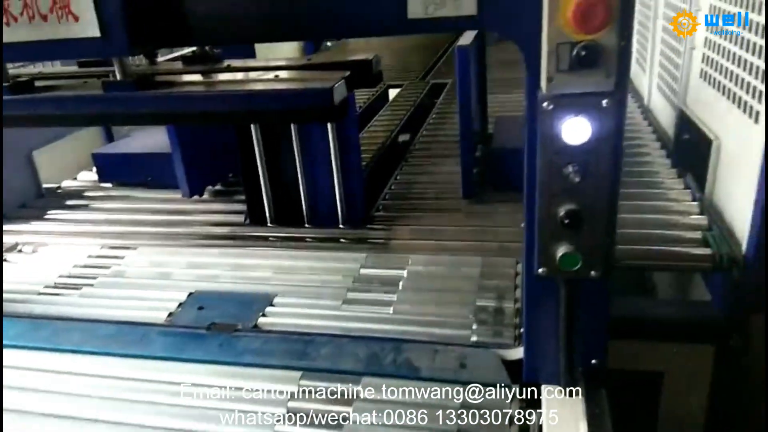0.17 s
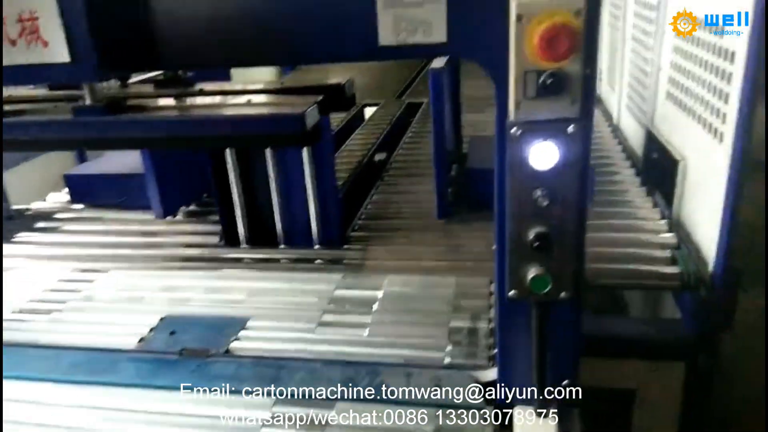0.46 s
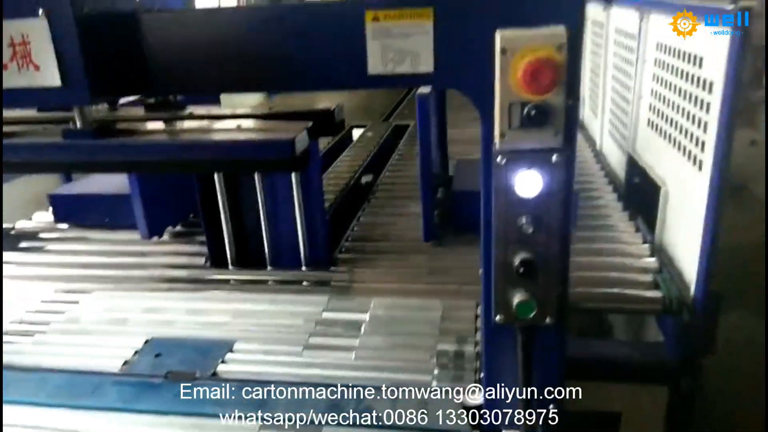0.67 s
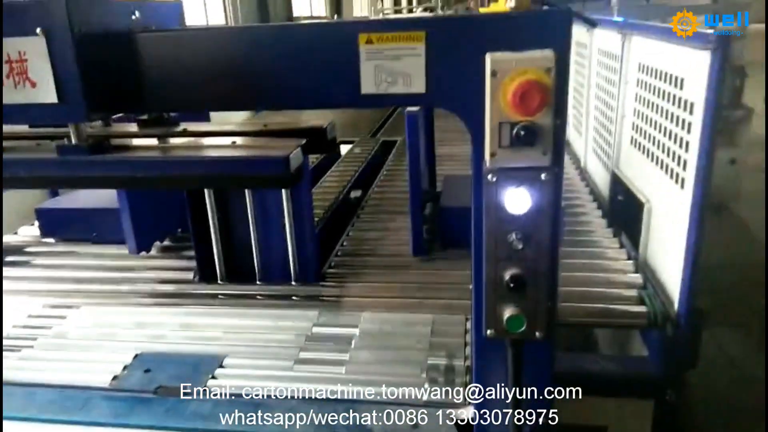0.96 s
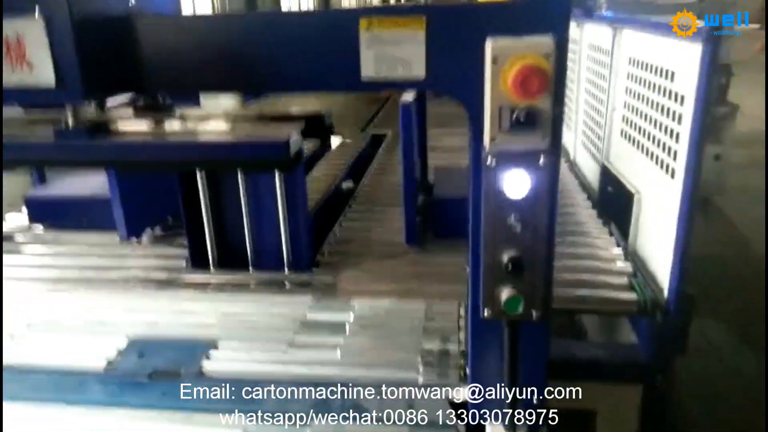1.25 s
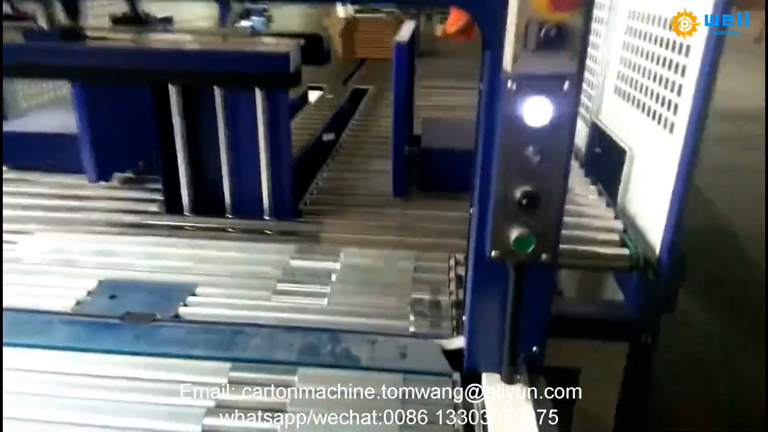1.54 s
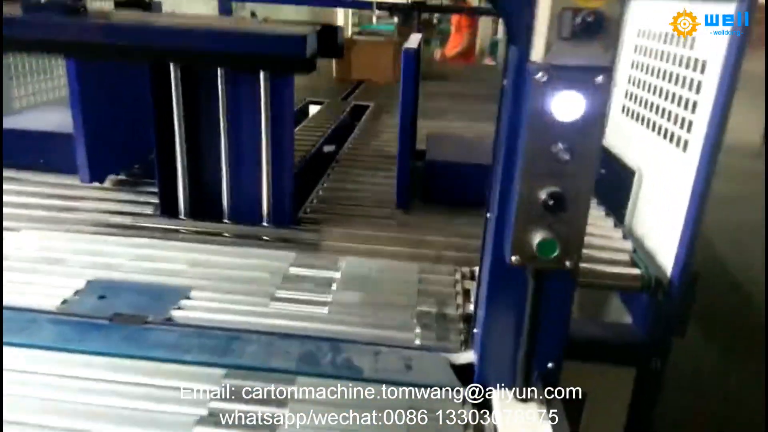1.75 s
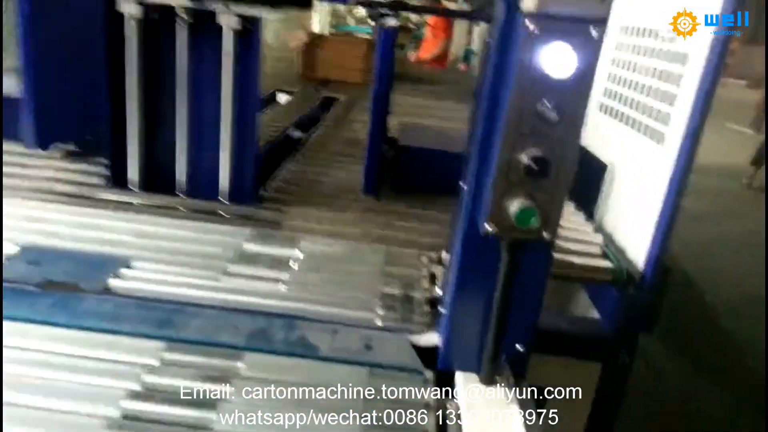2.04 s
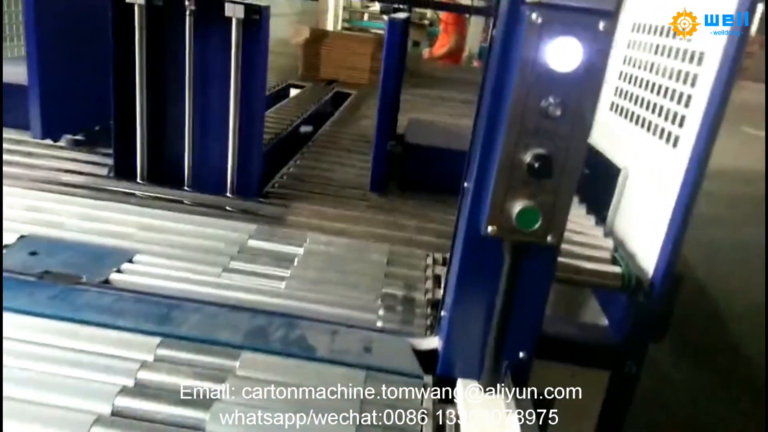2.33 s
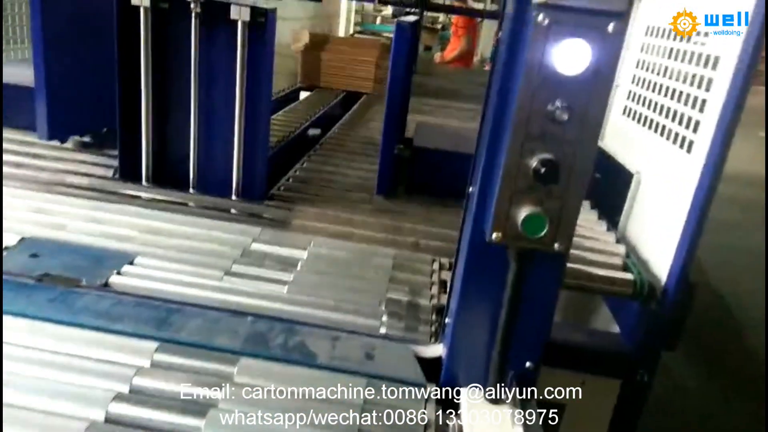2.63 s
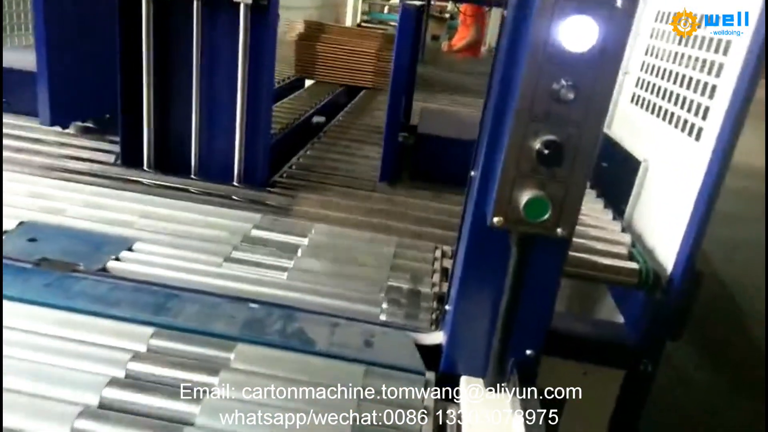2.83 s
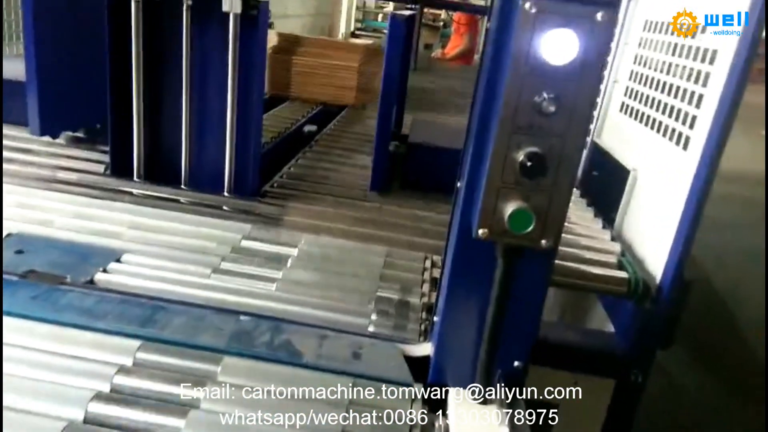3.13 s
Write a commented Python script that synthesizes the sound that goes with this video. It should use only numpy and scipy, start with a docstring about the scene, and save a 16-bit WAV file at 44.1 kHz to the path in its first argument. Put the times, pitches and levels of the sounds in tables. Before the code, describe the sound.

Close to a carton machine in a factory hall, a steel carriage slides and squeals with an air puff, slams twice within the first second, then rollers rumble and knock until cardboard scuffs past.

```python
"""In a factory hall, close to a carton machine: a steel carriage slides, rattles and squeals, then slams twice
against its stops; valves let out puffs of air and cardboard scuffs past, all as shaped noise and ringing modes.
Rollers knock in the frame as dying tones, over a rumble of noise and shaken modes. Farther off the hall hisses
and whines; its reflections follow the slams, gusts, scuffs and a far carriage."""
import sys
import numpy as np
from scipy import signal
from scipy.fft import rfft, irfft
from scipy.io import wavfile

SR = 44100
rng = np.random.default_rng(int(sys.argv[2]) if len(sys.argv) > 2 else 0)


def digitize_waveform(pressure):
    """Quantize a signal to 16-bit integers and store it at the path in sys.argv[1].

    Rows of a 2-D input are taken as channels; values are limited to [-1, 1].
    """
    field = np.atleast_2d(pressure).T
    bounded = np.clip(field, -1, 1)
    quanta = np.round(bounded * 32767).astype(np.int16)
    wavfile.write(sys.argv[1], SR, quanta)


def boost(x):
    """Linear amplitude factor 10**(x/20) for a level x in decibels (scalar or array-like)."""
    u = np.asarray(x, float) / 20
    return 10 ** u


N = 145089

# modes of the steel parts: (pitch [Hz], level [dB], t60 before the cap below [s])
STEEL = [(1427, 1.5, .04), (1690, 0, 0.043), (2460, -1, 0.036), (3505, 1.5, 0.033), (3756, 1, .04),
         (4210, 3, 0.022), (4610, -2.5, 0.036), (4810, -4, 0.023), (4925, -8, 0.026), (5165, 0.5, 0.027),
         (5320, -0.5, 0.031), (5800, -4, 0.013), (6430, -0.5, 0.019), (7150, -5, 0.016)]
STEEL_MAX_T60_S = 0.035
# spectrum of steel sliding on steel: (frequency [Hz], density [dB per Hz])
SLIDE_SPECTRUM = [(530, 2), (900, -4), (1050, -1), (2020, -4.5), (2790, -1), (3140, -4.5), (3670, 0),
                  (5310, 0), (7500, -14.5), (13800, -25), (15500, -28)]
CLICK_SPREAD_DB = 2.6  # mean excess of the random clicks behind rattle and ticks
KNOCK_RISE_S = 0.0028  # soft start of the roller knocks


def rms_one(x):
    """Scale to rms 1."""
    return x / np.sqrt(np.mean(x ** 2) + 1e-20)


def in_time(rows):
    """Gain from (time [s], level [dB]) rows, silent after the last."""
    s, db = np.transpose(rows)
    return boost(np.interp(np.arange(N) / SR, s, db, right=-120))


def drift(rate_hz):
    """Slow random wander of rms about 1: noise through two equal low-pass poles, computed at SR / 40."""
    pole = np.exp(-80 * np.pi * rate_hz / SR)
    slow = signal.lfilter([1], [1, -2 * pole, pole ** 2], rng.standard_normal(N // 40 + 2002))
    slow = rms_one(slow[2000:])  # the filter has settled
    return np.interp(np.arange(N) / 40, np.arange(len(slow)), slow)


def ring(clicks, hz, t60):
    """A damped resonance: a unit click sets a sine of starting height 1 ringing."""
    radius = boost(-60 / (max(t60, 0.003) * SR))
    angle = 2 * np.pi * hz / SR
    feedback = [1, -2 * radius * np.cos(angle), radius ** 2]
    return signal.lfilter([0, np.sin(angle)], feedback, clicks + 1e-18)


def colour(x, spectrum, tilt_db=0):
    """Shape by a spectrum over log frequency and a tilt in dB per octave; rms 1."""
    octave = np.log2(np.arange(N // 2 + 1) * SR / N + 1)
    hz, db = np.transpose(spectrum)
    gain_db = np.interp(octave, np.log2(hz), db, left=-90, right=-90) + tilt_db * octave
    return rms_one(irfft(rfft(x) * boost(gain_db), N))


def noise(spectrum, tilt_db=0):
    """Coloured noise whose level flickers by 0.6 dB."""
    return colour(rng.standard_normal(N), spectrum, tilt_db) * boost(0.6 * drift(22))


def grains(per_s, spread_db):
    """Random clicks of uneven size and either sign."""
    present = rng.random(N) < per_s / SR
    size = boost(spread_db * np.minimum(rng.exponential(1, N), 4))
    return present * size * rng.choice([-1, 1], N)


def whistle(hz, width_hz):
    """Noise passed twice through a narrow resonance; rms 1."""
    t60 = np.log(1000) / (np.pi * width_hz)
    once = ring(rng.standard_normal(N), hz, t60)
    return rms_one(ring(once, hz, t60))


def struck(rows, t60, rise_s):
    """Each (time [s], level [dB], pitch [Hz]) row rings one dying sine with a soft start."""
    out, t = np.zeros(N + SR), np.arange(SR // 2) / SR
    for s, db, hz in rows:
        i = int(s * SR)
        soft_start = (1 - np.exp(-t / rise_s)) ** 2
        out[i:i + len(t)] += boost(db - 60 * t / t60(hz)) * soft_start * np.sin(2 * np.pi * hz * t)
    return out[:N]


def gusts(rows, spectrum):
    """Noise bursts that rise linearly, hold and die exponentially, each with its own tilt."""
    out, t = 0, np.arange(N) / SR
    for s, db, attack, hold, t60, tilt_db in rows:
        rise = np.clip((t - s) / attack, 0, 1)
        fall = boost(db - 60 * np.maximum(t - s - attack - hold, 0) / t60)
        out = out + rise * fall * noise(spectrum, tilt_db)
    return out


def far_hall():
    """The far hall: steady noise as hiss, and a narrow band of noise as a wavering whine."""
    # hiss: (frequency [Hz], density [dB per Hz])
    hiss_spectrum = [(530, 8), (900, -9.5), (990, -8), (1350, -10), (2200, -11), (2890, -9), (4660, -12),
                     (5840, -10.5), (6350, -15), (8750, -18), (15500, -37.5)]
    hiss_db, whine_db, whine_hz, whine_width_hz = -47.5, -61, 6003, 75
    hiss = boost(hiss_db) * noise(hiss_spectrum)
    whine = boost(whine_db + 2 * drift(10)) * whistle(whine_hz, whine_width_hz)
    return hiss + whine


def hall_reflections(x):
    """Dense reflections: decaying noise above 300 Hz that begins 8 ms after the direct sound."""
    t60_s, wet_db = 0.39, -11
    t = np.arange(SR) / SR
    tail = rng.standard_normal(SR) * boost(-60 * t / t60_s) * (t > 0.008)
    tail = signal.sosfilt(signal.butter(2, [300, 22000], "band", fs=SR, output="sos"), tail)
    tail = tail / np.sqrt(np.sum(tail ** 2))
    return boost(wet_db) * signal.fftconvolve(x, tail)[:N]


def far_slide():
    """A farther carriage slides briefly: one burst of sliding noise."""
    # (time [s], level [dB], attack [s], hold [s], t60 [s], tilt [dB per octave])
    far_slides = [(2.612, -43.5, 0.0066, 0.036, 0.73, -2.5)]
    return gusts(far_slides, SLIDE_SPECTRUM)


def rollers():
    """Rumble, frame modes shaken by random bumps, deep bass, and knocks as dying tones."""
    # vigour of the rollers, driving rumble and frame: (time [s], level [dB])
    roll_level = [(0.0, -33.5), (0.06, -34.5), (0.19, -35), (0.93, -31.5), (0.96, -31), (1.03, -34.5),
                  (1.61, -36.5), (1.69, -33.5), (2.17, -34), (2.57, -32), (2.65, -33), (2.72, -29.5),
                  (2.93, -32), (3.1, -30.5), (3.29, -33)]
    # rumble: (frequency [Hz], density [dB per Hz])
    rumble_spectrum = [(15, -39), (25, -65), (59, -11.5), (92, -4.5), (261, -0.5), (300, -6), (338, -5),
                       (468, -11), (575, -8), (659, -11.5), (756, -10), (1120, -25), (1500, -30),
                       (1950, -37), (3300, -120)]
    # deep bass: (time [s], level [dB])
    bass_level = [(0, -69), (.7, -51), (1.0, -47), (1.5, -52.5), (1.8, -46), (2.2, -46.5), (2.6, -42.5),
                  (3.0, -43), (3.29, -33)]
    # modes of the frame: (pitch [Hz], level [dB], t60 [s])
    frame_modes = [(64.8, 6, 0.091), (178, -5, 0.065), (276, 4, 0.17), (335.6, 0, 0.13), (580, -2, 0.14),
                   (661.2, -1, 0.22)]
    # roller knocks: (time [s], level before the soft start [dB], pitch [Hz])
    knock_rows = [(0.061, -18.5, 339), (0.676, -25, 168), (0.713, -19, 250), (0.737, -21.5, 231),
                  (0.755, -19, 347), (0.77, -22, 227), (0.857, -18.5, 252), (0.89, -22, 268),
                  (0.94, -18, 260), (0.953, -7.5, 250), (1.351, -22.5, 248), (1.685, -21, 190),
                  (1.734, -19, 267), (1.77, -19.5, 277), (1.823, -18, 243.4), (1.858, -21, 263),
                  (1.989, -26.5, 150), (2.126, -24.5, 260), (2.254, -17.5, 260), (2.305, -22, 250),
                  (2.341, -22, 268), (2.402, -23.5, 184), (2.458, -24, 187), (2.486, -19.5, 307),
                  (2.523, -16, 261), (2.555, -21, 182), (2.599, -19.5, 365), (2.718, -20, 239),
                  (2.809, -21.5, 247), (3.043, -22, 242), (3.101, -13.5, 259), (3.243, -24.5, 287)]
    # lighter, higher knocks: (time [s], level before the soft start [dB], pitch [Hz])
    tap_rows = [(0.04, -28, 515), (0.321, -23, 730), (0.519, -16.5, 720), (0.556, -23.5, 600),
                (0.59, -23.5, 535), (0.813, -28, 490), (1.914, -25.5, 604), (2.029, -24, 670),
                (2.107, -27.5, 700), (2.539, -33, 654), (2.675, -20.5, 675), (2.703, -24, 573),
                (2.787, -27, 554), (2.961, -26, 595), (3.008, -18, 564), (3.113, -20, 688),
                (3.233, -21, 562)]
    bumps_per_s, frame_db = 60.0, -8  # the bumps are drawn anew at this rate for each mode
    knock_cycles, tap_cycles = 25.8, 48.5  # cycles until 60 dB down

    shaken = sum(boost(db) * ring(grains(bumps_per_s, 5.2), hz, t60) for hz, db, t60 in frame_modes)
    rumble = boost(-3) * noise(rumble_spectrum) + boost(frame_db) * rms_one(shaken)
    bass = in_time(bass_level) * whistle(68, 46)
    knocks = struck(knock_rows, lambda hz: knock_cycles / hz, KNOCK_RISE_S)
    taps = struck(tap_rows, lambda hz: tap_cycles / hz, KNOCK_RISE_S)
    return in_time(roll_level) * rumble + bass + knocks + taps


def ticks():
    """Small roller ticks: random brief pings at 24 scattered pitches, their level wavering."""
    # (time [s], level [dB])
    tick_level = [(0, -57), (1.9, -57), (2.05, -54), (2.3, -56.5), (2.5, -52), (3.29, -52.5)]
    ticks_per_s, low_hz, high_hz, cycles = 600.0, 2000, 3200, 60.0  # cycles until 60 dB down
    pitches = np.geomspace(low_hz, high_hz, 24)
    rate = ticks_per_s / len(pitches)
    pings = rms_one(sum(ring(grains(rate, CLICK_SPREAD_DB), hz, cycles / hz) for hz in pitches))
    return in_time(tick_level) * boost(2 * drift(8)) * pings


def scuffs():
    """Cardboard scuffs past: bursts of noise in the bands of the card."""
    # (time [s], level [dB], attack [s], hold [s], t60 [s], tilt [dB per octave])
    scuff_rows = [(3.132, -29.5, 0.031, 0.019, 0.29, 4.2), (3.225, -37.5, 0.011, 0.024, 0.55, 5)]
    # cardboard, before the tilt: (frequency [Hz], density [dB per Hz])
    card_spectrum = [(410, -22), (700, 2.5), (920, -21), (1190, 3.5), (1430, -11), (1850, -2),
                     (2300, -14.5), (2570, -5.5), (3150, -25), (4300, -25.5), (6000, -39), (12000, -80)]
    return gusts(scuff_rows, card_spectrum)


def puffs():
    """Valves let out air: turbulent noise that bursts out and dies away."""
    # (time [s], level [dB], attack [s], hold [s], t60 [s], tilt [dB per octave])
    puff_rows = [(.045, -32.5, 0.013, 0.037, 0.7, -1.5), (.572, -42.5, .002, .005, 0.15, 2),
                 (1.485, -42.5, 0.018, 0.045, 1.0, -1.9)]
    # escaping air, before the tilt: (frequency [Hz], density [dB per Hz])
    air_spectrum = [(1880, -10), (3200, -4), (4030, -5), (5530, -1), (8790, -5), (10600, -5.5),
                    (11400, -9.5), (15500, -10.5)]
    return gusts(puff_rows, air_spectrum)


def early_scuff():
    """Cardboard scuffs past early on: a long dying burst of low, broad noise."""
    # (time [s], level [dB], attack [s], hold [s], t60 [s], tilt [dB per octave])
    early_scuff_rows = [(.7, -31.5, 0.0089, 0.023, 1.18, -2)]
    # cardboard of the early scuff, before the tilt: (frequency [Hz], density [dB per Hz])
    early_card_spectrum = [(300, -4), (800, -6.5), (1050, 0), (1900, -5.5), (2300, -13)]
    return gusts(early_scuff_rows, early_card_spectrum)


def glide():
    """Second squeal, rising as the carriage gains speed: a narrow noisy tone on a pitch curve."""
    # (time [s], level [dB], pitch [Hz])
    glide_rows = [(.55, -70, 3550), (.6, -44, 3600), (.66, -42, 3850), (.72, -41, 4150), (.8, -39.5, 4230),
                  (.93, -40.5, 4220), (1.0, -70, 4220)]
    width_hz = 75
    s, db, hz = np.transpose(glide_rows)
    phase = np.cumsum(np.interp(np.arange(N) / SR, s, hz)) * 2 * np.pi / SR
    tone = drift(width_hz) * np.sin(phase) + drift(width_hz) * np.cos(phase)
    return in_time(np.c_[s, db]) * tone * boost(2 * drift(15))


def carriage():
    """Friction noise, loose parts rattling in the steel modes, the squeal and single chinks."""
    # sliding noise and rattle: (time [s], level [dB])
    slide_level = [(0, -28.5), (.05, -25.5), (.12, -26.5), (.2, -33.5), (.3, -34), (.45, -28.5),
                   (.56, -32.5), (.6, -30), (.75, -31), (.93, -31.5), (1.05, -34.5), (1.2, -43.5),
                   (1.4, -64)]
    # squeal of the guide: (time [s], level [dB])
    squeal_level = [(0.0, -47), (0.036, -37), (0.11, -39), (0.202, -52), (0.346, -64), (0.514, -65),
                    (0.762, -35.5), (0.778, -42.5), (0.972, -44), (1.2, -77)]
    # chinks: (time [s], level before the soft start [dB], pitch [Hz])
    chink_rows = [(0.0328, -30, 2790), (0.5726, -24, 3570), (0.6115, -22, 3600), (0.6495, -26.5, 5340),
                  (0.8444, -32, 4200), (1.5075, -38, 7800), (2.4877, -39, 3640), (2.503, -41, 2710),
                  (2.6793, -40, 2630), (2.8933, -40.5, 2170), (3.195, -43, 4170), (3.2585, -37, 2500)]
    rattle_per_s, rattle_db = 430, -13.5
    squeal_hz, squeal_width_hz = 2843, 22
    chink_t60_s, chink_rise_s = 0.063, 0.00049

    rattle = 0
    for hz, db, t60 in STEEL:
        clicks = grains(rattle_per_s / len(STEEL), CLICK_SPREAD_DB)
        rattle = rattle + boost(db) * ring(clicks, hz, min(t60, STEEL_MAX_T60_S))
    friction = boost(-4.5) * noise(SLIDE_SPECTRUM)
    slide = in_time(slide_level) * (friction + boost(rattle_db) * rms_one(rattle))
    squeal = in_time(squeal_level) * whistle(squeal_hz, squeal_width_hz)
    return slide + squeal + struck(chink_rows, lambda hz: chink_t60_s, chink_rise_s)


def slams():
    """Each slam is a dying clatter into the steel modes near its pitch, with a broad crack."""
    # slams and rebounds: (time [s], clatter peak [dB], t60 of the fall [s], strongest pitch [Hz],
    # crack level [dB])
    slam_rows = [(0.3228, -8.5, 0.15, 3800, -14.5), (0.355, -10.5, 0.13, 4930, -21),
                 (0.376, -17.5, 0.28, 3680, -35), (.941, -3, 0.081, 5380, -18), (.946, -8.5, .1, 5200, -34),
                 (0.953, -16.5, 0.12, 4200, -30.5), (0.964, -17, 0.22, 4660, -29)]
    # crack: (frequency [Hz], density [dB per Hz])
    crack_spectrum = [(350, -22), (600, -14.5), (1690, -6.5), (2370, -18.5), (2990, -8), (3240, -9.5),
                      (5220, -4), (7330, -17), (10700, -15.5), (15500, -22)]
    spread_oct, max_off_db, clatter_per_s = 0.33, 12, 4000.0  # modes off the pitch are 6 dB down at the spread
    # the treble of a crack starts stronger and dies sooner
    snap_hz, snap_db, snap_faster, crack_rise_s = 7040, 4, 2.9, 0.0022

    out, t = np.zeros(N), np.arange(N) / SR
    crack = noise(crack_spectrum)
    treble = signal.sosfilt(signal.butter(2, snap_hz, "high", fs=SR, output="sos"), crack)
    for s, db, t60, centre_hz, crack_db in slam_rows:
        fall = (t >= s) * boost(-60 * np.maximum(t - s, 0) / t60)
        span = slice(int(s * SR), int(s * SR) + SR // 2)
        body = 0
        for hz, mode_db, mode_t60 in STEEL:
            off_db = min(max_off_db, 6 * (np.log2(hz / centre_hz) / spread_oct) ** 2)
            clatter = (grains(clatter_per_s, 1.1) * fall ** 2)[span]
            tone = ring(clatter, hz, min(mode_t60, STEEL_MAX_T60_S))
            body = body + boost(mode_db - off_db) * tone / np.abs(tone).max()
        out[span] += boost(db) * body / np.abs(body).max()
        rise = np.clip((t - s) / crack_rise_s, 0, 1)
        snap = boost(snap_db) * fall ** snap_faster * treble
        out += boost(crack_db) * rise * (fall * (crack - treble) + snap)
    return out


def scene():
    """All sources, one channel; only the slams and gusts feed the reflections."""
    echoing = slams() + puffs() + far_slide() + scuffs() + early_scuff()
    machine = carriage() + glide() + ticks() + rollers()
    return (echoing + hall_reflections(echoing) + machine + far_hall())[None]


def band_limit(x):
    """A steep low-pass at the top of the band."""
    return signal.sosfilt(signal.butter(12, 16500, fs=SR, output="sos"), x)


def record(dry):
    """The microphone loses the deepest bass and the top."""
    low_hz, top_stop_hz = 53.3, 16100  # the top is 60 dB down from the stop edge on
    x = signal.sosfilt(signal.butter(3, low_hz, "high", fs=SR, output="sos"), dry)
    x = signal.sosfilt(signal.cheby2(14, 60, top_stop_hz, fs=SR, output="sos"), x)
    return band_limit(x)


dry = scene()
out = record(dry)
digitize_waveform(out)
```